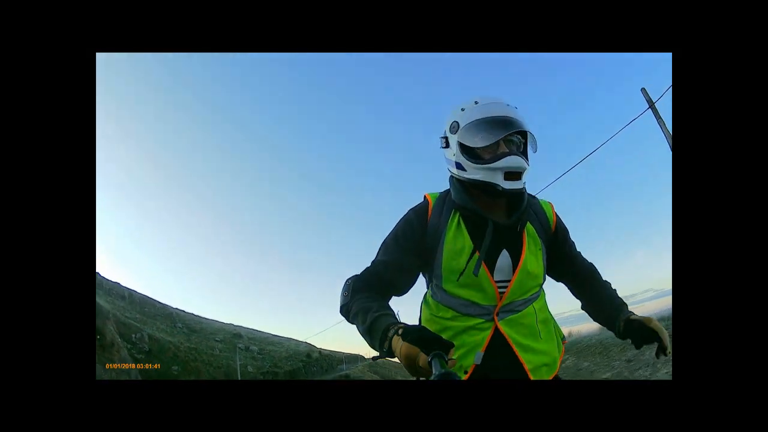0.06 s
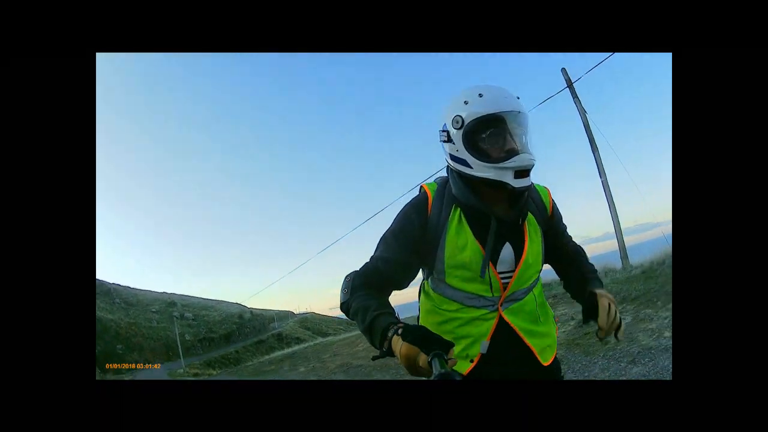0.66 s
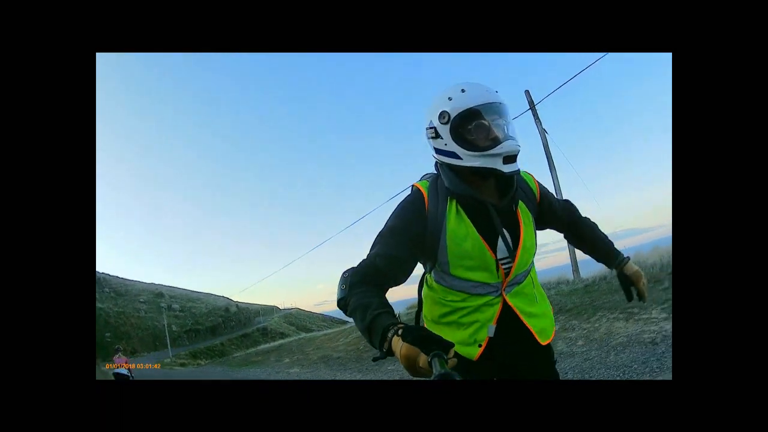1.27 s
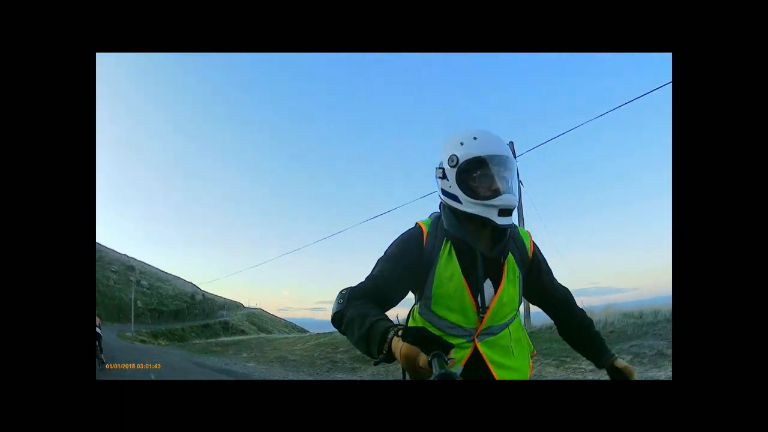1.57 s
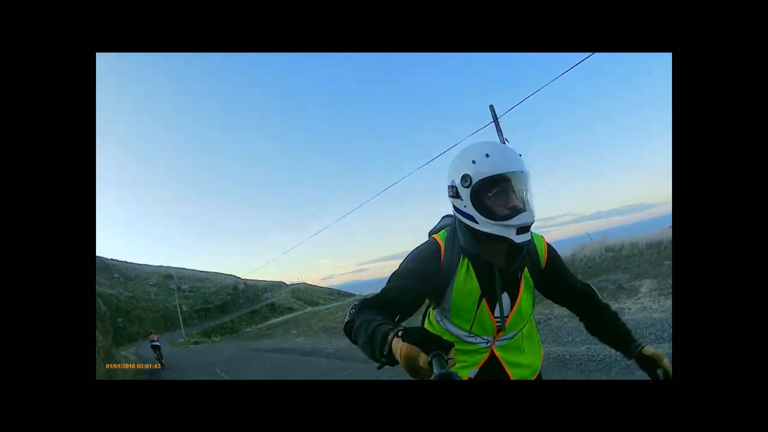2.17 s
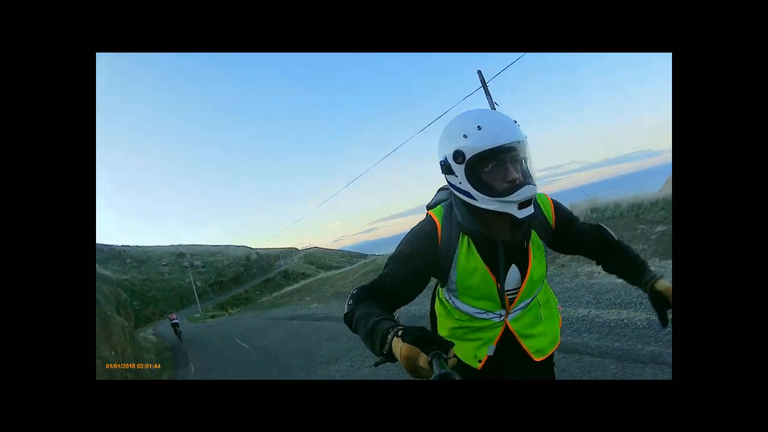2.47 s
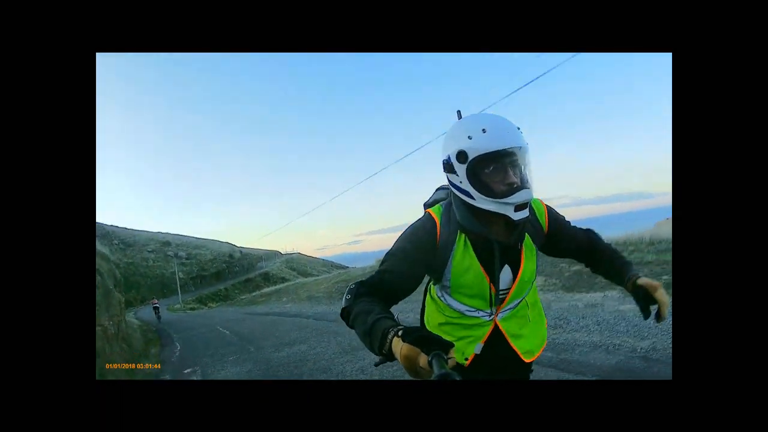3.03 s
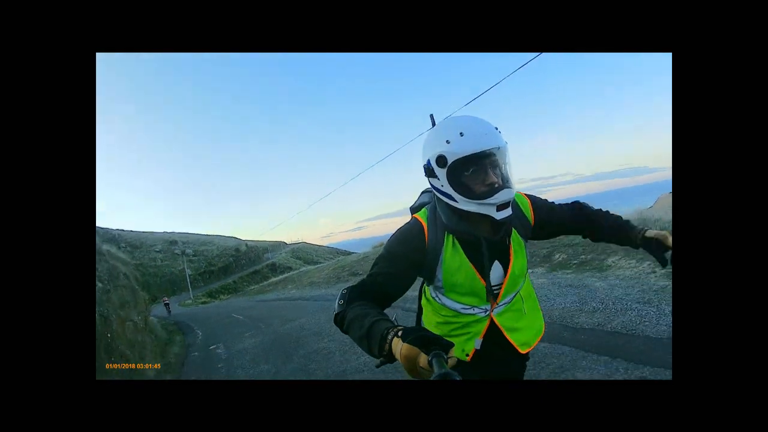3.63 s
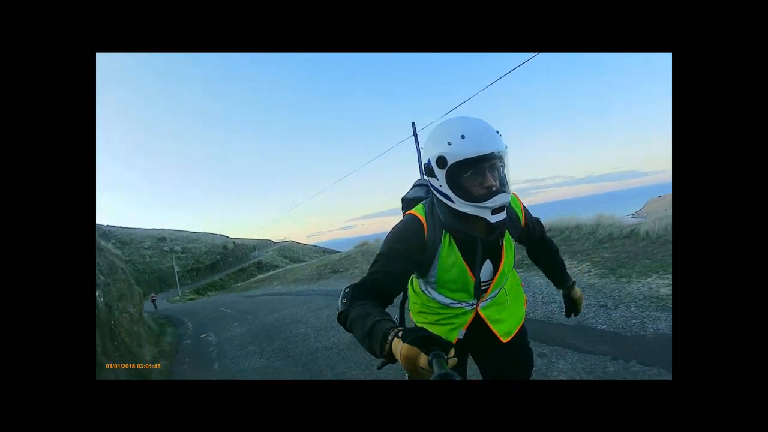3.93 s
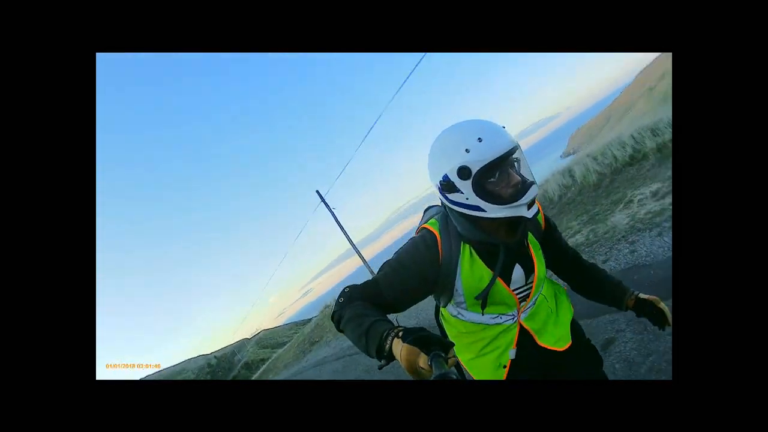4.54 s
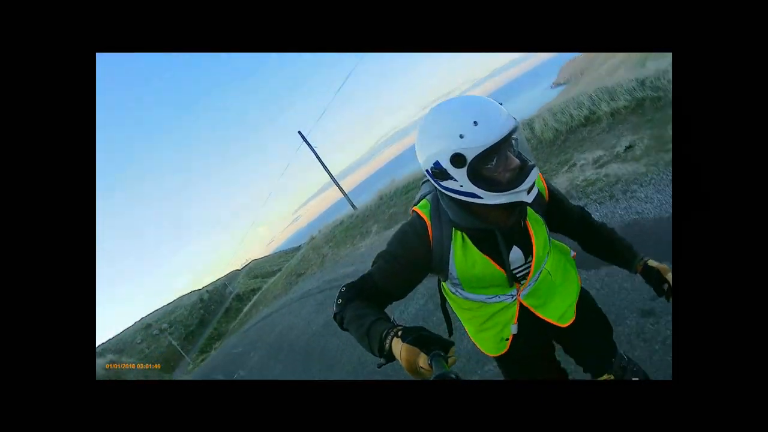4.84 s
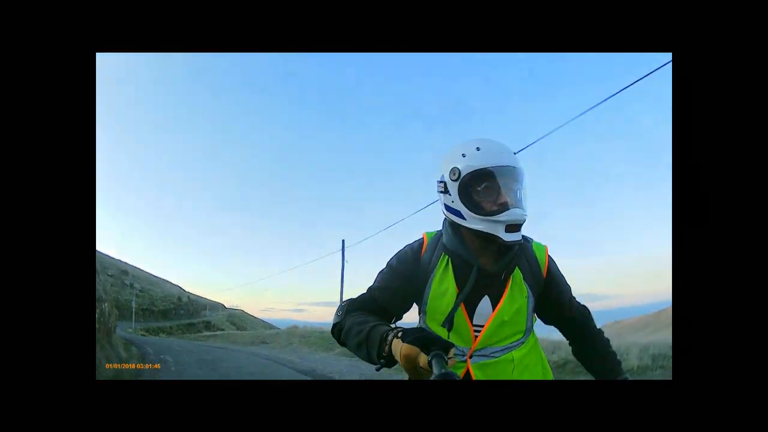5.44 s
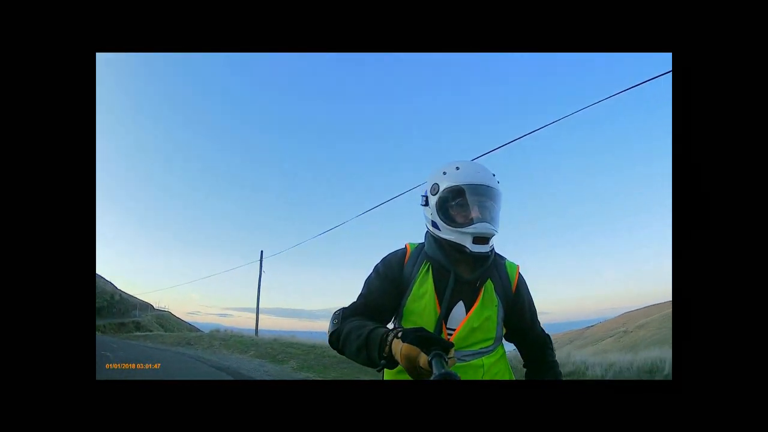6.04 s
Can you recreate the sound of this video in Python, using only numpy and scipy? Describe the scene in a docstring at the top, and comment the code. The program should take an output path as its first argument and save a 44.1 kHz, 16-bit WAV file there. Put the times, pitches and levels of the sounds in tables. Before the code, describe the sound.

Close, hollow clicks and clacks from a loose camera mount, above the low roar of rolling wheels and growing gusts.

```python
"""Downhill on a two-wheeled board

The rider pumps the board down a paved road in a steady rhythm, holding a camera on a pole.
Bumps make the loose mount knock and chatter, and the camera's plastic case rings with every contact.
Underneath, the tyres roar softly and the mount rattles, both swelling with each push.
The case drones and wind buffets it as speed builds, over a thin bed of electronic hiss."""
import sys
import numpy as np
from scipy import signal
from scipy.io import wavfile

SR = 44100
rng = np.random.default_rng(int(sys.argv[2]) if len(sys.argv) > 2 else 0)


def bounce(signal):
    """Save signal as a 16-bit WAV file at the path given by the first command-line argument."""
    frames = np.transpose(np.atleast_2d(signal))
    limited = np.clip(frames, -1, 1)
    pcm = np.round(limited * 32767).astype(np.int16)
    wavfile.write(sys.argv[1], SR, pcm)


N = 277830


def from_db(db):
    """Decibels to gain."""
    return 10 ** (np.asarray(db) / 20)


def unit_rms(x):
    """Scale to rms 1."""
    return x / np.sqrt(np.mean(x ** 2) + 1e-24)


def unit_burst(x):
    """Scale a short sound to the energy of 20 ms at rms 1."""
    return x / np.sqrt(np.sum(x ** 2) / (.02 * SR))


def automation(rows):
    """Join breakpoints into one curve for each column after the time."""
    times, *columns = np.transpose(rows)
    return [np.interp(np.arange(N) / SR, times, column) for column in columns]


def butter(x, hz, kind, order=2):
    """Causal Butterworth filter."""
    return signal.sosfilt(signal.butter(order, hz, kind, fs=SR, output="sos"), x)


def drift(rate_hz):
    """A smooth random wobble with rms near 1."""
    hop, warm_up = 40, 2000
    r = np.exp(-2 * np.pi * rate_hz * hop / SR)
    noise = rng.standard_normal(N // hop + warm_up + 2)
    slow = signal.lfilter([1], [1, -2 * r, r * r], noise)[warm_up:]
    return np.interp(np.arange(N) / hop, np.arange(len(slow)), unit_rms(slow))


def place(track, start_s, sound):
    """Mix a short sound in at a given time."""
    start = max(int(start_s * SR), 0)
    track[start:start + len(sound)] += sound[:N - start]


def ring(force, hz, t60):
    """One mode: a unit click starts a decaying sine of height 1."""
    r, w = from_db(-60 / (t60 * SR)), 2 * np.pi * hz / SR
    return signal.lfilter([0, np.sin(w)], [1, -2 * r * np.cos(w), r * r], force + 1e-18)


def resonance(x, hz, width_hz):
    """Band-pass with gain 1 at its peak."""
    r, w = np.exp(-np.pi * width_hz / SR), 2 * np.pi * hz / SR
    return signal.lfilter(np.array([1, 0, -1]) * (1 - r * r) / 2, [1, -2 * r * np.cos(w), r * r], x)


def fluttering_noise(spectrum, flutter_db, flutter_hz):
    """Half-octave bands of noise that flutter partly together, partly alone; rms 1."""
    points_hz, points_db = np.transpose(spectrum)
    edges = 20 * 2 ** np.arange(0, 8.6, .5)
    together = drift(flutter_hz)
    white = rng.standard_normal((2, N))
    out = np.zeros(N)
    for k, (low, high) in enumerate(zip(edges, edges[1:])):
        band_db = np.interp(np.log(low * high) / 2, np.log(points_hz), points_db, left=-90, right=-90)
        wobble_db = flutter_db * (together + drift(flutter_hz))
        out += from_db(band_db + wobble_db) * butter(white[k % 2], [low, high], "band")
    return unit_rms(out)


def electronics(hiss_db=-75, whine_db=-89, whine_hz=14500):
    """The camera's circuits lay down an even hiss and a faint, wavering whine."""
    pitch_hz = whine_hz + 40 * drift(1.0) + 35 * drift(60)
    whine = np.sin(2 * np.pi * np.cumsum(pitch_hz) / SR)
    hiss = butter(rng.standard_normal(N), 15200, "low", order=1)
    return from_db(hiss_db) * hiss + from_db(whine_db) * whine


# Light ticks of the rider's gear. Each row: start in seconds, level in dB before the trim.
GEAR_TICKS = [(0.1376, -56), (0.254, -68)]


def gear_ticks(t60=0.044, trim_db=-4.5):
    """The rider's gear scuffs in small, bright bursts of noise."""
    out, t = np.zeros(N), np.arange(SR // 10) / SR
    for start_s, db in GEAR_TICKS:
        scuff = unit_rms(butter(rng.standard_normal(len(t)), [6200, 9500], "band"))
        place(out, start_s, from_db(db + trim_db - 60 * t / t60) * scuff)
    return out


# The modes of case and pole. Each row: pitch in Hz, level in dB, seconds to fade by 60 dB.
CASE_MODES = [(186, 12, 0.013), (237, -14, 0.022), (308, -15, 0.011), (404, 3.5, 0.055), (480, 11.5, 0.029),
              (510, -25.5, 0.021), (548, -1.5, 0.077), (629, -3.5, 0.11), (759, -2.5, 0.024),
              (880, -1.5, 0.042), (1010, 2, 0.024), (1112, -2.5, 0.019), (1305, -1, 0.016),
              (1690, 6.5, 0.0069), (2100, -0.5, 0.0095), (2334, -16.5, 0.02), (2915, 3.5, 0.00067),
              (3885, -10, 0.014), (4100, 7, 0.012), (4430, 4.5, 0.0046)]


def case_ring(force, spread_db, favoured_hz=1000, favour_db=0.0):
    """The case rings, one row a mode; the point of contact favours the modes near one pitch."""
    modes = []
    for hz, db, t60 in CASE_MODES:
        nearness = np.exp(-(np.log2(hz / favoured_hz) / .2) ** 2)
        mode_db = db + favour_db * nearness + spread_db * rng.standard_normal()
        modes.append(from_db(mode_db) * ring(force, hz, t60))
    return np.array(modes)


def case_drone(air_db, hz=378, width_hz=95, cruise_drone_db=-60.5, cruise_air_db=-59, build_s=0.34):
    """Steady shaking keeps one low mode sounding; it fades in, then gently follows the airspeed."""
    fade_in_db = -22 * np.exp(-np.arange(N) / SR / build_s)
    level_db = cruise_drone_db + .22 * (air_db - cruise_air_db) + fade_in_db
    hum = resonance(resonance(rng.standard_normal(N), hz, width_hz), hz, width_hz)
    return from_db(level_db) * unit_rms(hum)


# The wind's bass-heavy tone. Each row: frequency in Hz, relative noise density in dB.
WIND_SPECTRUM = [(13, -43), (22, -12.5), (87, 2), (193, -4), (228, 2), (280, -9.5), (340, -18.5),
                 (413, -8.5), (560, -20.5), (600, -22), (780, -59), (1320, -120)]
# Short gusts on top of the steady wind. Each row: time of the peak in seconds, rise in dB.
GUST_PEAKS = [(1.87, 7.5), (2.29, 5.5), (3.07, 10), (3.65, 4.5), (4.46, 8), (4.609, 7.5), (4.77, 8),
              (5.42, 4), (5.53, 5.5), (5.66, 7.5), (6.22, 1)]


def wind(air_db, gust_half_s=0.044, boom_db=-5, strong_db=-62.5, thinning=0.66):
    """Lumpy buffeting sets the two lowest modes of the case booming; light air lacks the deep bass."""
    t = np.arange(N) / SR
    wind_db = air_db + sum(db * np.exp(-((t - s) / gust_half_s) ** 2) for s, db in GUST_PEAKS)
    buffets = fluttering_noise(WIND_SPECTRUM, flutter_db=1.35, flutter_hz=34)
    boom = unit_rms(sum(ring(rng.standard_normal(N), hz, t60) for hz, _, t60 in CASE_MODES[:2]))
    bass_gain = from_db(thinning * np.minimum(wind_db - strong_db, 0))
    bass = butter(buffets, 190, "low", order=3)
    upper = butter(buffets, 186, "high", order=3)
    return from_db(wind_db) * (bass_gain * bass + upper + from_db(boom_db) * boom)


# Airspeed, written as the steady wind level. Each row: time in seconds, level in dB.
AIR_LEVELS = [(0.0, -67.5), (0.33, -70), (2.12, -69.5), (2.3, -61), (3.67, -57), (4.14, -61), (4.65, -50),
              (5.02, -56), (5.81, -61.5), (6.3, -58.5)]


def airflow():
    """The board's speed through the air drives both the drone and the wind."""
    air_db, = automation(AIR_LEVELS)
    return case_drone(air_db) + wind(air_db)


# The rider's pumping. Each row: time in seconds, roughness between pushes in dB, change on a push in dB.
PUMP_LOAD = [(0, -60, 4), (1.3, -64, 4.5), (3.5, -62, 4), (4.9, -63.5, 4), (5.6, -59.5, 1.5),
             (6.3, -59.5, -3)]


def ride_roughness(first_push_s=.35, period_s=0.643, sharpness=1.32):
    """Each push loads the tyres; gives roughness in dB. Sharpness above 1 shortens the pushes."""
    rest_db, push_db = automation(PUMP_LOAD)
    push = (1 + np.cos(2 * np.pi * (np.arange(N) / SR - first_push_s) / period_s)) / 2
    return rest_db + push_db * push ** sharpness


# The tone of the tyre roar. Each row: frequency in Hz, relative noise density in dB.
TYRE_SPECTRUM = [(110, -29.5), (175, -6.5), (260, -4.5), (450, -4), (620, -7), (900, -6), (1400, -15),
                 (1900, -23), (2400, -15.5), (3100, -32), (5000, -43)]
# Hollow resonances of the case. Each row: centre in Hz, width in Hz, gain in dB.
CAVITY_PEAKS = [(850, 270, -17.5), (1422, 110, 2.5), (2410, 290, -9), (4320, 48, 3)]


def tyre_roar(rough_db, trim_db=-1):
    """Rubber on patchy asphalt, heard through the hollow case; its level follows the roughness."""
    roar = fluttering_noise(TYRE_SPECTRUM, flutter_db=2.64, flutter_hz=28)
    hollow = roar + sum(from_db(db) * resonance(roar, hz, width) for hz, width, db in CAVITY_PEAKS)
    midrange_rms = np.std(butter(hollow, [450, 2500], "band"))
    return from_db(rough_db + trim_db) * hollow / midrange_rms


def mount_rattle(rough_db, ticks_per_s=900, trim_db=-7.5):
    """Road grit keeps the mount buzzing with clusters of tiny ticks that ring the case."""
    hits = rng.random(N) < ticks_per_s * from_db(4 * drift(12)) / SR
    sizes = from_db(4 * np.minimum(rng.exponential(1, N), 3))
    signs = rng.choice([-1, 1], N)
    ticking = case_ring(hits * sizes * signs, spread_db=0.5).sum(axis=0)
    return from_db(rough_db + trim_db) * unit_rms(butter(ticking, [620, 2200], "band"))


def stray_taps(per_s=3.0, level_db=-74, spread_db=5, hardness_db=22, chatter_db=-9):
    """Faint, hard contacts of the mount at random times, as rows like those of the knocks."""
    times = np.cumsum(rng.exponential(1 / per_s, 60))
    levels_db = level_db + rng.uniform(-spread_db, spread_db, len(times))
    favoured_hz = 380 * 2 ** rng.uniform(0, 1.1, len(times))
    return [(s, db, hz, hardness_db, chatter_db)
            for s, db, hz in zip(times, levels_db, favoured_hz) if s < N / SR]


def contact_force(chatter_db, lead_s, approach_t60=0.02, settle_t60=0.078, echo_db=-17, echo_s=0.001814):
    """The joint scrapes in, strikes and slips as it settles; the treble echoes once along the pole."""
    t = np.arange(SR // 8) / SR - lead_s
    slips = (rng.random(len(t)) < 2500 / SR) * rng.standard_normal(len(t))
    scrape = from_db(chatter_db - 60 * np.maximum(t / settle_t60, -t / approach_t60))
    crush = from_db(-11 - 60 * np.maximum(t / .02, -t / .007))
    force = crush * slips + butter(scrape * slips, 3900, "low")
    force[int(lead_s * SR)] += 1  # the strike itself
    echo = butter(np.roll(force, int(echo_s * SR)), 900, "high", order=1)
    return force + from_db(echo_db) * echo


# Crossovers in Hz that split the case's modes into thud, body, clack and tick.
CROSSOVERS_HZ = [720, 1500, 2900]
# The mix of those four groups, low to high. Each row: level against the knock in dB,
# share of the hardness it gains, boost in dB if it holds the favoured pitch.
GROUP_MIX = [(0.95, -0.71, 6), (-0.56, -0.2, 6.5), (-3, 0.34, 4), (-24.5, 0.73, 0)]


def knock_tone(force, favoured_hz, hardness_db):
    """The case answers a knock; a harder hit shifts the weight from the low modes to the high ones."""
    modes = case_ring(force, spread_db=1.0, favoured_hz=favoured_hz, favour_db=7.0)
    mode_group = np.digitize([hz for hz, _, _ in CASE_MODES], CROSSOVERS_HZ)
    favoured_group = np.digitize(favoured_hz, CROSSOVERS_HZ)
    tone = np.zeros(len(force))
    for k, (db, share, boost_db) in enumerate(GROUP_MIX):
        group_db = db + share * hardness_db + boost_db * (k == favoured_group)
        ringing = unit_burst(modes[mode_group == k].sum(axis=0))
        tone += (-1) ** k * from_db(group_db) * ringing  # neighbouring groups alternate in polarity
    return butter(tone, [205, 6400], "band", order=3)


def knock_crack(attack_s=0.00035, t60=0.036):
    """The bright snap of noise on the front of a knock."""
    t = np.arange(SR // 8) / SR
    envelope = (1 - np.exp(-t / attack_s)) * from_db(-60 * t / t60)
    return unit_burst(butter(rng.standard_normal(len(t)) * envelope, [3200, 11000], "band", order=1))


# Knocks of the loose mount. Each row: start in seconds, level in dB, favoured pitch in Hz,
# hardness in dB, chatter in dB.
MOUNT_KNOCKS = [(0.1925, -54.5, 520, -6, -14), (0.4231, -55.5, 1380, 7, -11), (0.4354, -43.5, 480, 4.5, 2),
                (0.4921, -33.5, 448, 0, -13.5), (0.5221, -55.5, 510, 9, -8), (0.5885, -64.5, 1020, -5, -25),
                (0.7947, -40.5, 337, 0, -17.5), (0.7976, -42, 870, 0.5, -10), (0.8716, -61.5, 400, -18, -9),
                (0.883, -48, 1290, 4.5, -15), (0.9034, -55.5, 1300, 4, 1), (0.9668, -44.5, 1690, -2, -20),
                (1.0653, -52.5, 480, -1, -18), (1.0763, -57, 470, 3, -36), (1.117, -63, 880, 4, -19),
                (1.345, -63.5, 382, 6, -10), (1.4317, -51.5, 395, 3, -31), (1.5573, -39.5, 644, 5.5, -17.5),
                (1.581, -51.5, 850, 0, -24), (1.635, -58, 830, -1, -3), (1.6777, -44.5, 1690, -1, -15),
                (1.7336, -58, 530, -5.5, 4), (1.8182, -55, 413, 0.5, 19), (2.1173, -51.5, 360, -5, 2),
                (2.126, -50.5, 1150, 3, 16), (2.1707, -42, 1690, -1.5, -14), (2.21, -47.5, 600, 1, -9),
                (2.3599, -50, 630, -1, -4), (2.553, -48, 530, 1, -14), (2.7817, -41, 1690, 0, -16),
                (2.8391, -50.5, 580, 1, -17), (2.9354, -46.5, 1690, -5.5, -19), (3.0726, -55, 470, -4, -16),
                (3.1436, -54, 517, 3, -10), (3.2275, -73, 400, 30, -7), (3.3342, -48.5, 420, -4.5, -13),
                (3.3635, -51, 580, -7, 11), (3.3729, -40.5, 1890, 5, -16), (3.4124, -43, 636, 3, 6),
                (3.5473, -53, 570, 1.5, -6), (3.5902, -60, 860, -10, -10), (3.769, -59, 1040, 18, -34),
                (4.0366, -57, 1320, 23, -29), (4.0516, -42, 1690, 2, -35), (4.062, -53.5, 600, -9.5, -6),
                (4.0714, -49.5, 640, 2, -2), (4.151, -54.5, 625, -1, -14), (4.2275, -48, 1690, -4.5, -17),
                (4.2541, -56, 1260, 10, -8), (4.6504, -47.5, 850, -2.5, -29), (4.6592, -45, 850, 1.5, 3),
                (4.7043, -50, 780, -6.5, -7), (4.8486, -56, 1020, 3, -23), (4.8791, -51, 510, 0, -16),
                (4.9194, -60, 796, -10, -16), (5.0038, -54.5, 453, -3, -19), (5.0186, -55, 416, -1.5, -9),
                (5.6, -62.5, 2700, 19.5, -31), (5.8882, -62.5, 860, 2, -20), (5.8998, -56, 480, -2, -22),
                (5.9189, -58.5, 473, -5, -18)]


def mount_knocks(lead_s=.008, crack_db=-27.5, crack_share=0.14):
    """Bumps knock the loose mount: each hit rings the case and cracks, a little louder when hard."""
    out = np.zeros(N)
    for start_s, level_db, favoured_hz, hardness_db, chatter_db in MOUNT_KNOCKS + stray_taps():
        force = contact_force(chatter_db, lead_s)
        place(out, start_s - lead_s, from_db(level_db) * knock_tone(force, favoured_hz, hardness_db))
        place(out, start_s, from_db(level_db + crack_db + crack_share * hardness_db) * knock_crack())
    return out


def scene():
    """Every layer reaches one microphone inside the case, with the knocks up front."""
    background = electronics() + gear_ticks() + airflow()
    rough_db = ride_roughness()
    rolling = tyre_roar(rough_db) + mount_rattle(rough_db)
    return (background + rolling + mount_knocks())[None]


def record(dry, cutoff_hz=15300):
    """A steep low-pass shaves off the very top."""
    return signal.sosfilt(signal.ellip(10, .1, 70, cutoff_hz, fs=SR, output="sos"), dry)


dry = scene()
out = record(dry)
bounce(out)
```